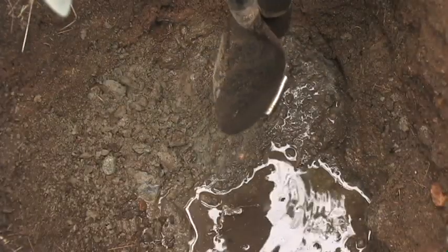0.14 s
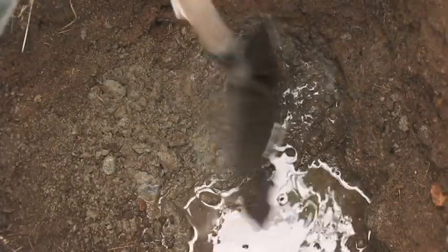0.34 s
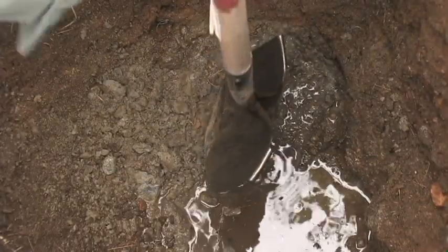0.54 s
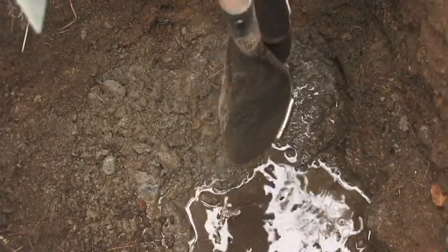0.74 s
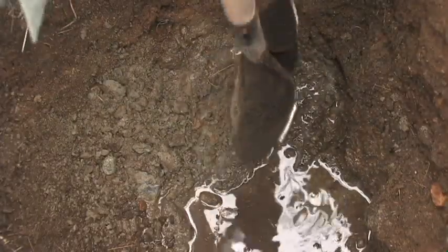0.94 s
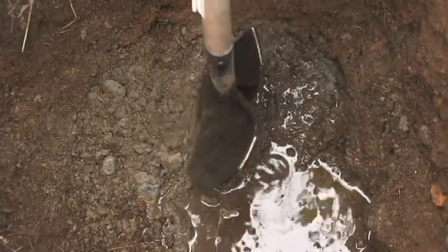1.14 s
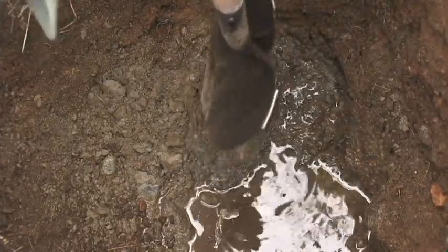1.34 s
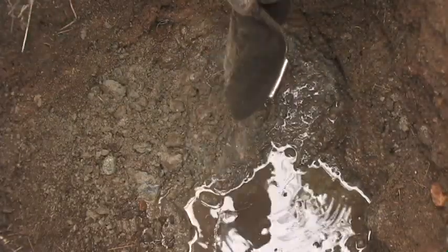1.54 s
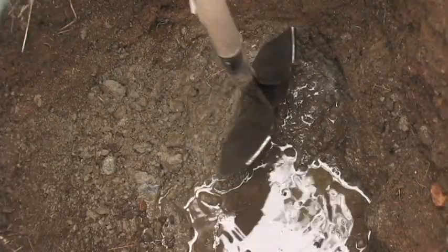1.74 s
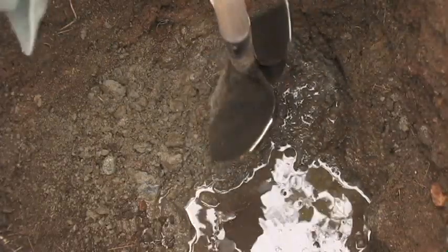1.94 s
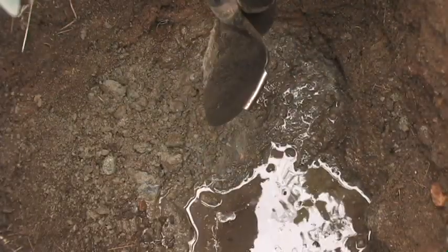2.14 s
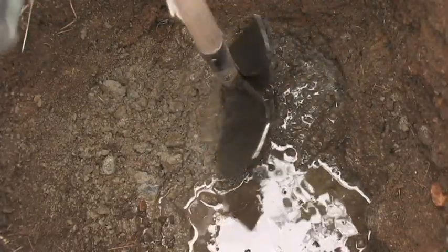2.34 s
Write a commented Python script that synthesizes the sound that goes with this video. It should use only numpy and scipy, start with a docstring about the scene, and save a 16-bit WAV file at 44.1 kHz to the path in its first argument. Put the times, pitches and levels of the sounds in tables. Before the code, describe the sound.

Four close shovel strikes in gritty ground, each a crunching thud with a brief metallic ring.

```python
"""Shovel in wet soil

Close by, down in a pit, a two-bladed steel shovel is jabbed four times into hard wet soil. Each jab crunches
and thuds; the steel scrapes on, the blades clank together and ring while crumbs fall. Small birds chirp far
off, a low breeze brushes the microphone, and the limiter ducks after each blow."""
import sys
import numpy as np
from scipy import signal
from scipy.fft import rfft, irfft, next_fast_len
from scipy.io import wavfile
from scipy.ndimage import uniform_filter1d, map_coordinates

SR = 44100
rng = np.random.default_rng(int(sys.argv[2]) if len(sys.argv) > 2 else 0)


def wav_out(sig):
    """Save sig, one row per channel (or a flat mono array), as 16-bit PCM at SR to the path in sys.argv[1]."""
    wavfile.write(sys.argv[1], SR, np.round(np.clip(np.atleast_2d(sig).T, -1, 1) * 32767).astype(np.int16))


N = 106060
T = np.arange(24000) / SR  # seconds within one event


def amp(db):
    """Decibels to gain."""
    return 10 ** (np.asarray(db) / 20)


def unit(x):
    """Scale to rms 1."""
    return x / np.sqrt(np.mean(x ** 2) + 1e-20)


def rise(attack_s):
    """A straight climb to full level."""
    return np.minimum(T / attack_s, 1)


def fade(t60_s, hold_s=0):
    """Full level for the hold time, then an exponential decay."""
    return np.exp(-np.log(1000) * np.maximum(T - hold_s, 0) / t60_s)


def add(out, start_s, x):
    """Mix x into out from start_s."""
    i = round(start_s * SR)
    x, i = x[max(-i, 0):], max(i, 0)
    out[i:i + len(x)] += x[:max(N - i, 0)]


def wobble(knots_per_s, size=len(T)):
    """A smooth random curve."""
    return map_coordinates(rng.standard_normal(1000), [np.arange(size) * knots_per_s / SR], mode="mirror")


def noise(spectrum, tilt_db=0, size=len(T)):
    """Noise of rms 1 with a spectrum, tilted by tilt_db per octave above 500 Hz."""
    octave = np.log2(np.fft.rfftfreq(size, 1 / SR) + 1)
    hz, db = np.transpose(spectrum)
    gain = amp(np.interp(octave, np.log2(hz + 1), db) + tilt_db * np.maximum(octave, np.log2(500)))
    return unit(irfft(rfft(rng.standard_normal(size)) * gain, size))


def ring(modes, tilt_db=0, scatter_db=1):
    """Decaying modes whose levels vary from blow to blow."""
    out = np.zeros(len(T))
    for hz, db, t60_s in modes:
        level = amp(db + scatter_db * rng.normal() + tilt_db * np.log2(hz / 2000))
        out += level * fade(t60_s) * np.sin(2 * np.pi * (hz * T + rng.random()))
    return out


def echo(x, t60_s):
    """A diffuse tail of reflections."""
    tail = rng.standard_normal(len(T)) * fade(t60_s) * rise(0.0016)
    return signal.fftconvolve(x, tail / np.linalg.norm(tail))[:N]


# spectra of open air, far rumble and wind on the microphone: frequency_hz, relative_db
AIR_SPECTRUM = [(120, -30.5), (200, 1), (399, -4.5), (515, -4), (1590, -7), (2510, -17.5), (2850, -13),
                (3360, -14), (6710, -23), (15500, -29)]
RUMBLE_SPECTRUM = [(20, -8.5), (50, -8), (85, -1.5), (125, -8), (165, -9.5), (200, -30.5), (300, -33.5),
                   (600, -54)]
GUST_SPECTRUM = [(12, -7.5), (28, 2.5), (48, -4), (75, -12.5), (130, -25.5), (300, -61)]
# the breeze rising and falling at the microphone: time_s, level_db
GUST_LEVELS = [(0.0, -42.5), (0.02, -68), (0.291, -54), (0.34, -42), (0.47, -64.5), (0.87, -36),
               (1.13, -62), (1.56, -43.5), (1.741, -61), (1.87, -41), (2.34, -44.5), (2.4, -62)]

def outdoors():
    """Steady air, a distant rumble and slow gusts of breeze on the microphone."""
    air = amp(-60) * noise(AIR_SPECTRUM, size=N)
    rumble = amp(-52.5 + 1.7 * wobble(17, N)) * noise(RUMBLE_SPECTRUM, size=N)
    gust_db = np.interp(np.arange(N) / SR, *np.transpose(GUST_LEVELS))
    return air + rumble + amp(gust_db) * noise(GUST_SPECTRUM, size=N)


def whistle(hz, warble=0.032, rasp_db=3):
    """A bird's warbling, slightly raspy note, with an overtone on its low pitches."""
    phase = 2 * np.pi * np.cumsum(hz * (1 + warble * wobble(400))) / SR
    overtone = amp(-9) * (2800 / hz) ** 5 * np.sin(2 * phase)
    return (np.sin(phase) + overtone) * unit(amp(rasp_db * wobble(300)))


# one call, which dips, swoops up and falls away: time_s, pitch_hz, relative_db
CALL_SHAPE = [(0, 3510, -11), (0.019, 2950, -6), (0.041, 2750, -6.5), (0.057, 3700, -2.5),
              (0.073, 4800, 0.5), (.084, 4850, -2), (.1, 3900, -13.5), (.115, 3400, -21.5)]
# that bird calling far from the microphone: start_s, level_db, pitch_ratio, opening_gain_db
BIRD_CALLS = [(-.045, -57.5, 0.85, 2), (0.152, -56, 1, -2.5), (.56, -62.5, 0.99, -10),
              (0.777, -57, 1, -3.5), (1.188, -59.5, 1.02, -16.5), (1.39, -54.5, 1.02, 1.5),
              (1.828, -50, 0.99, -1), (2.052, -51, 0.98, 0.5)]
# other distant birds: start_s, length_s, from_hz, to_hz, level_db
THIN_WHISTLES = [(.09, 0.087, 4560, 3340, -62), (1.959, .07, 5740, 4200, -61.5),
                 (2.15, 0.214, 5010, 4940, -67.5)]

def birds(opening_s=0.055):
    """One bird repeats its two-voiced swooping call, others whistle thinly; all echo in the trees."""
    out = np.zeros(N)
    time_s, hz, relative_db = np.transpose(CALL_SHAPE)
    for start_s, db, ratio, opening_db in BIRD_CALLS:
        shape_db = np.interp(T, time_s, relative_db, right=-120) + opening_db * (T < opening_s)
        pitch = ratio * np.interp(T, time_s, hz)
        voices = whistle(pitch) + amp(-9) * whistle(1.15 * pitch)
        add(out, start_s, amp(db + shape_db) * rise(0.0035) * voices)
    for start_s, length_s, from_hz, to_hz, db in THIN_WHISTLES:
        progress = rise(length_s)
        arch = np.sqrt(np.abs(np.sin(np.pi * progress)))
        add(out, start_s, amp(db) * arch * whistle(from_hz + (to_hz - from_hz) * progress))
    return out + amp(-4) * echo(out, t60_s=0.13)


def swaying(modes, tilt_db=0, free_s=1, sway_hz=4, sway_db=2.1):
    """Long modes that waver as the shovel moves; pressure stops the high ones first."""
    out = np.zeros(len(T))
    for hz, db, t60_s in modes:
        pitch = hz + sway_hz * wobble(30)
        level = amp(db + tilt_db * np.log2(hz / 2000) + sway_db * wobble(30))
        pressed = fade(0.11, hold_s=free_s * (2000 / hz) ** 0.38)
        out += level * fade(t60_s) * pressed * np.sin(2 * np.pi * (np.cumsum(pitch) / SR + rng.random()))
    return out


# long modes of each blade and of the whole shovel flexing: pitch_hz, relative_db, t60_s
NEAR_MODES = [(1507, -2, 0.63), (2750, 1, 0.43), (3970, -26, 0.55), (4000, -23, .22), (4436, -33.5, 1.4),
              (5187, -35, .25), (5860, -36, 0.48)]
FAR_MODES = [(1597, -3.5, 0.67), (1825, -5.5, 0.6), (1925, -3, 0.48), (2077, 3, 0.47), (2186, -2.5, 0.74)]
FLEX_MODES = [(446, -1, 0.39)]
# ringing in the pit, faint at the start and then after each jab:
# start_s, hum_db, near_db, near_tilt_db_per_octave, far_db, far_tilt_db_per_octave, free_s
BLADE_RINGS = [(0, -93, -87, 7, -60, 19.5, 0.035), (0.415, -65, -33, 7, -32.5, 15, 0.2),
               (1.076, -36.5, -26, 6.5, -37, -6, 0.19), (1.711, -38.5, -24.5, -0.5, -52, -20, 0.2),
               (2.362, -47, -30.5, -13, -31.5, 9, .2)]

def blades():
    """Both blades ring over a low hum; the soil presses the near blade and the hum still."""
    out = np.zeros(N)
    for start_s, hum_db, near_db, near_tilt_db, far_db, far_tilt_db, free_s in BLADE_RINGS:
        near = amp(near_db) * swaying(NEAR_MODES, near_tilt_db, free_s)
        far = amp(far_db) * swaying(FAR_MODES, far_tilt_db)
        hum = amp(hum_db) * swaying(FLEX_MODES, free_s=free_s)
        add(out, start_s, (near + far + hum) * rise(0.0016))
    return out


def upper_modes(low_hz=2860, high_hz=12660, t60_s=0.1, count=28):
    """Many high plate modes; the point of contact decides which ones speak."""
    offset, strength = rng.random((2, count))
    hz = low_hz * (high_hz / low_hz) ** ((np.arange(count) + offset) / count)
    t = T[:len(T) // 4, None]
    decay = np.exp(-np.log(1000) * t / t60_s * np.sqrt(hz / low_hz))
    tones = np.sin(2 * np.pi * hz * t) * decay
    return np.pad(tones @ strength ** 2, (0, len(T) - len(t)))


# short modes of the steel while it touches the soil: pitch_hz, relative_db, t60_s
DAMPED_MODES = [(1828, -9, 0.09), (2080, -13, .08), (2794, 4, 0.033), (2917, -1.5, 0.089),
                (3337, 0.5, 0.039), (3876, -11.5, 0.083), (3903, -7, .09), (4210, -3.5, 0.063),
                (4940, -10, 0.08), (5430, -15, 0.12), (7550, -13, 0.057), (8230, -11.5, 0.035),
                (10300, -8.5, 0.021), (11680, -16.5, 0.066)]

def steel(contact, ring_db, scatter_db=1):
    """A contact noise together with the short modes that it excites."""
    low, high = ring(DAMPED_MODES, scatter_db=scatter_db), upper_modes()
    body = low / np.linalg.norm(low) + amp(-5.5) * high / np.linalg.norm(high)
    return contact + amp(ring_db) * signal.fftconvolve(contact, body)[:len(T)]


# grit against steel, heard close: frequency_hz, relative_db
GRIT_SPECTRUM = [(100, -10), (500, 2.5), (1200, -1), (3000, 2.5), (5000, 1.5), (7000, -1.5), (10000, -3),
                 (15500, -16)]
# crumbs and drips falling in the pit: start_s, level_db
FALLING_CRUMBS = [(0.0469, -46.5), (0.202, -49.5), (0.4574, -39.5), (0.4993, -45), (0.5582, -54.5),
                  (0.8745, -53), (1.1164, -33.5), (1.1474, -43.5), (1.1921, -44.5), (1.7847, -44.5),
                  (1.825, -40.5)]

def crumbs():
    """Bits of soil tick against the steel."""
    out = np.zeros(N)
    for start_s, db in FALLING_CRUMBS:
        tick = noise(GRIT_SPECTRUM, tilt_db=1) * rise(0.0011) * fade(0.039)
        add(out, start_s, amp(db) * steel(tick, ring_db=-4.5))
    return out


def grainy(spectrum, tilt_db, rough_db=0.5):
    """Noise whose level flickers slightly from grain to grain."""
    grain_db = rough_db * np.clip(wobble(1500), -2, 2)
    return unit(noise(spectrum, tilt_db) * amp(grain_db))


def rough_tone(hz):
    """A resonance whose pitch shakes as the soil gives way."""
    return np.sin(2 * np.pi * hz * T + 0.47 * wobble(200))


# spectra of the breaking crust and the crumbling clod: frequency_hz, relative_db
CRUNCH_SPECTRUM = [(60, -12), (250, -8.5), (600, -5.5), (1070, 1), (1350, -3), (1750, -2), (3300, 0),
                   (5200, -0.5), (7000, -7), (9500, -5), (15500, -21)]
CLOD_SPECTRUM = [(40, -3), (170, -5), (300, -5.5), (480, 0), (720, -4), (1100, -9), (2000, -7), (4000, -18),
                 (12000, -29)]
# the shaft and packed ground: pitch_hz, relative_db, t60_s
SHAFT_MODES = [(146, -11.5, 0.26), (267.5, -4, 0.16), (382.2, 0, 0.16), (467.6, -2.5, 0.14),
               (625, -3.5, 0.18), (792, -5, 0.073), (1033, -6.5, 0.08)]
# blade meets the pit floor, close to the microphone:
# start_s, crunch_db, tilt_db_per_octave, thud_db, thud_hz, clod_db, shaft_db, clack_hz, clack_db
SOIL_JABS = [(0.3480, -4.5, 4, -4.5, 505.8, -13, -22.5, 3320, -17),
             (1.0244, -4.5, -0.46, -7, 538.4, -15, -30.5, 2434, -12),
             (1.6874, -4.5, 0, -20.5, 472, -14.5, -26.5, 1706, -9.5),
             (2.3400, -10.5, 0, -12.5, 233, -13.5, -18.5, 3296, -17.5)]

def jabs(lead_s=0.0028, swell_s=0.0082):
    """The edge touches and crushes the crust; the blade clacks and the ground thuds under it."""
    out = np.zeros(N)
    bite, swell = rise(0.0015), rise(swell_s)
    for start_s, crunch_db, tilt_db, thud_db, thud_hz, clod_db, shaft_db, clack_hz, clack_db in SOIL_JABS:
        touch = noise(CLOD_SPECTRUM) * rise(lead_s) * fade(0.015, lead_s)
        crunch = grainy(CRUNCH_SPECTRUM, tilt_db) * bite * fade(0.025, hold_s=0.004)
        clod = noise(CLOD_SPECTRUM) * swell * fade(0.11, swell_s)
        ground = rough_tone(thud_hz) + amp(-5.5) * rough_tone(1.44 * thud_hz)
        thud = ground * swell * fade(0.032, swell_s)
        clack = rough_tone(clack_hz) * bite * fade(0.036, hold_s=0.004)
        add(out, start_s - lead_s, amp(crunch_db - 19.5) * touch)
        add(out, start_s, amp(crunch_db) * steel(crunch, ring_db=-15) + amp(clack_db) * clack)
        add(out, start_s, amp(clod_db) * clod + amp(thud_db) * thud)
        add(out, start_s, amp(shaft_db) * swell * ring(SHAFT_MODES))
    return out


def friction(tilt_db, grains_per_s=260, grain_share=0.65):
    """Sliding noise with separate sharp grains on top."""
    snaps = (rng.random(len(T)) < grains_per_s / SR) * rng.random(len(T))
    bursts = unit(signal.fftconvolve(snaps, fade(0.006))[:len(T)])
    return unit(noise(GRIT_SPECTRUM, tilt_db) * (1 - grain_share + grain_share * bursts))


def wedged(contact, ring_db, count=22):
    """The soil's grip gives the blade new, quickly damped resonances at every scrape."""
    pitches = np.geomspace(1400, 12000, count) * np.exp(0.05 * rng.standard_normal(count))
    body = ring([(hz, 0, 0.05) for hz in pitches], tilt_db=1, scatter_db=3)
    ringing = signal.fftconvolve(contact, body / np.linalg.norm(body))[:len(T)]
    return unit(contact + amp(ring_db) * ringing)


# steel sliding into the pit floor: start_s, length_s, level_db, tilt_db_per_octave, ring_db
GRIT_SCRAPES = [(0.354, 0.031, -38.5, -1.5, -2.5), (0.387, 0.042, -21, -0.8, -3),
                (1.043, 0.0056, -23.5, -2.5, 6), (1.055, 0.026, -25.5, -3.5, 1),
                (1.696, .014, -26, -1.5, -3), (1.711, 0.013, -21, 2.5, -4), (1.726, 0.0343, -29.5, -4, 3.5),
                (1.745, 0.011, -29, 0, -16), (2.363, 0.038, -26.5, -4, -8.5)]

def scrapes():
    """The blade scrapes deeper over sharp grains."""
    out = np.zeros(N)
    for start_s, length_s, db, tilt_db, ring_db in GRIT_SCRAPES:
        slide = wedged(friction(tilt_db), ring_db) * rise(0.0013) * fade(0.025, length_s)
        add(out, start_s, amp(db) * steel(slide, ring_db=-6.5, scatter_db=2.5))
    return out


# the shaft, heard close: start_s, level_db, centre_hz
SHAFT_KNOCKS = [(.392, -25, 260), (.4135, -27.5, 630), (1.079, -27, 330), (1.717, -27.5, 450),
                (1.747, -28, 620), (2.361, -24, 423)]

def knocks(falloff_db_per_octave=7):
    """The shaft knocks as the blade comes to rest; modes away from the centre pitch speak less."""
    out = np.zeros(N)
    for start_s, db, centre_hz in SHAFT_KNOCKS:
        modes = [(hz, mode_db - falloff_db_per_octave * abs(np.log2(hz / centre_hz)), t60_s)
                 for hz, mode_db, t60_s in SHAFT_MODES]
        add(out, start_s, amp(db) * rise(0.0026) * ring(modes))
    return out


# the two blades striking each other: start_s, noise_db, tilt_db_per_octave, noise_t60_s, ring_db
BLADE_CLANKS = [(0.417, -13, -3.5, 0.059, -9), (1.0746, -15, 4.5, 0.026, -28),
                (1.0803, -5, 0, 0.023, -17.5), (2.3624, -6.5, 3, 0.045, -21)]

def clanks():
    """The two blades clank together: a gritty burst and a short ring."""
    out = np.zeros(N)
    for start_s, noise_db, tilt_db, t60_s, ring_db in BLADE_CLANKS:
        catch = steel(grainy(GRIT_SPECTRUM, tilt_db) * fade(t60_s), ring_db=-14.5)
        add(out, start_s, (amp(noise_db) * catch + amp(ring_db) * ring(DAMPED_MODES)) * rise(0.0015))
    return out


def scene():
    """One microphone by the shovel in its pit, with the outdoors behind it."""
    shovel = crumbs() + jabs() + scrapes() + knocks() + clanks()
    pit_echo = amp(-18) * echo(shovel, t60_s=0.087)
    return (outdoors() + birds() + blades() + shovel + pit_echo)[None]


def record(dry):
    """A limiter ducks and recovers slowly; peaks that slip past are rounded off; the band ends steeply."""
    threshold_db, max_duck_db, recover_db_per_s, attack_s = -20, 6, 22.5, 0.0064
    ceiling, top_hz, edge_hz = 0.66, 16150, 600
    level_db = 10 * np.log10(np.abs(uniform_filter1d(dry[0] ** 2, size=128)) + 1e-12)
    over_db = np.clip(level_db - threshold_db, 0, max_duck_db)
    recovery_db = recover_db_per_s * np.arange(N) / SR
    held_db = np.maximum.accumulate(over_db + recovery_db) - recovery_db
    pole = np.exp(-1 / (attack_s * SR))
    duck_db = signal.lfilter([1 - pole], [1, -pole], held_db)
    rounded = ceiling * np.tanh(dry * amp(-duck_db) / ceiling)
    size = next_fast_len(N + SR // 2)
    hz = np.fft.rfftfreq(size, 1 / SR)
    lowpass = np.sin(np.pi / 2 * np.clip((top_hz - hz) / edge_hz, 0, 1)) ** 2
    return irfft(rfft(rounded, size) * lowpass, size)[:, :N]


dry = scene()
out = record(dry)
wav_out(out)
```